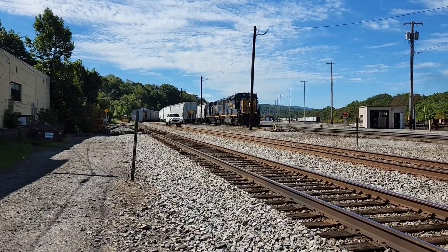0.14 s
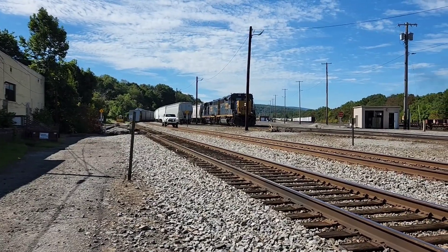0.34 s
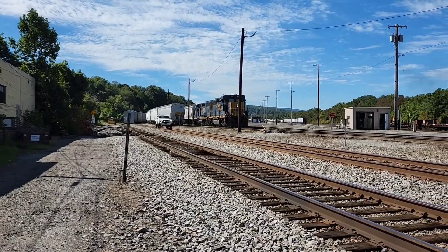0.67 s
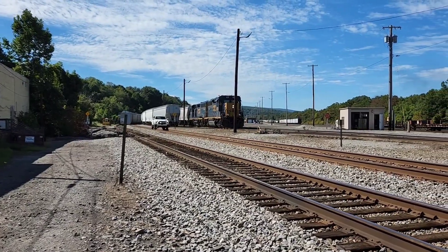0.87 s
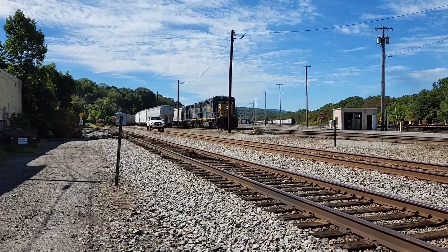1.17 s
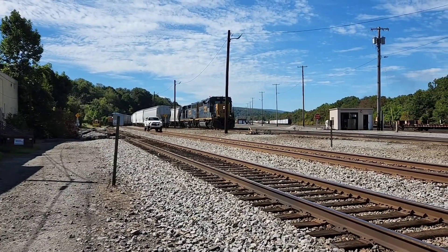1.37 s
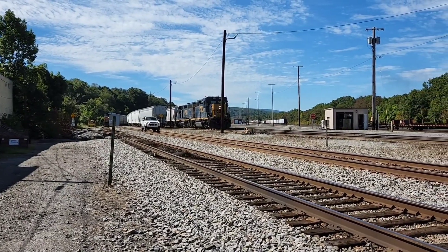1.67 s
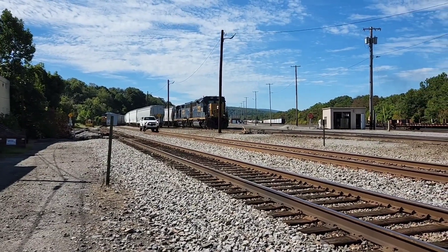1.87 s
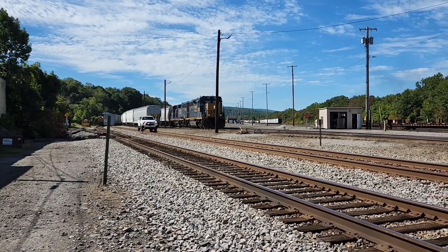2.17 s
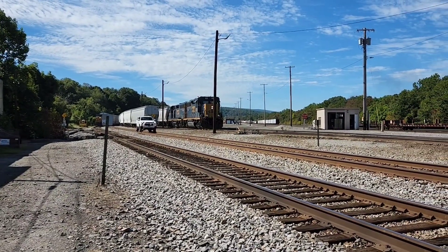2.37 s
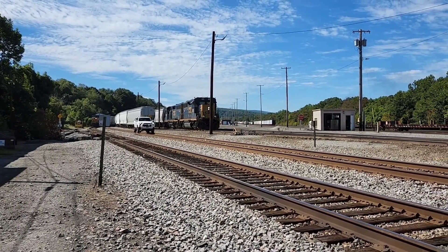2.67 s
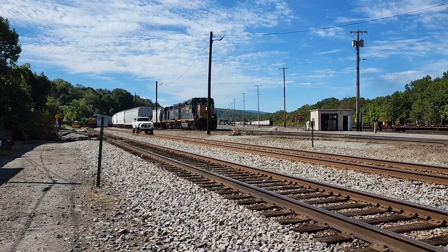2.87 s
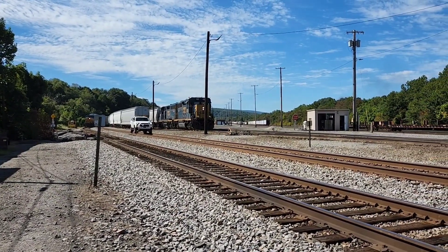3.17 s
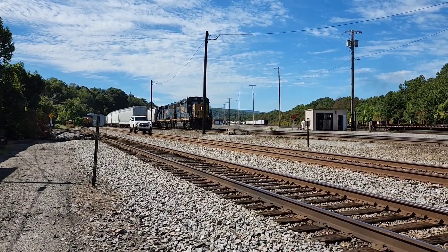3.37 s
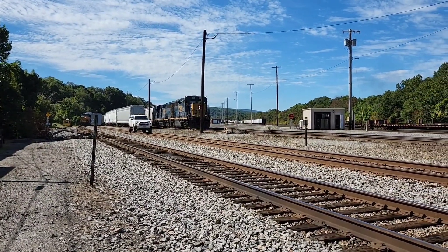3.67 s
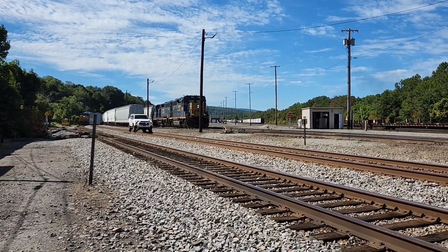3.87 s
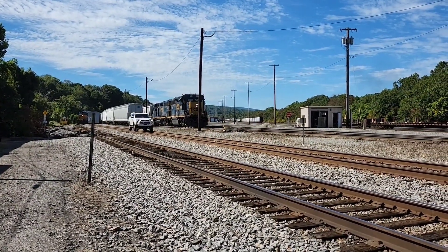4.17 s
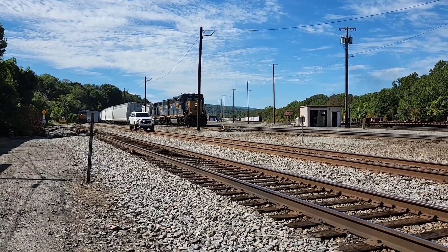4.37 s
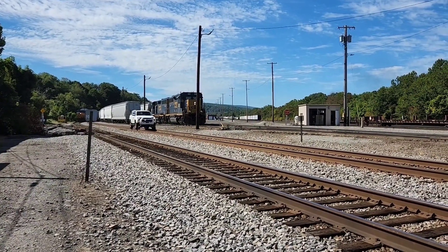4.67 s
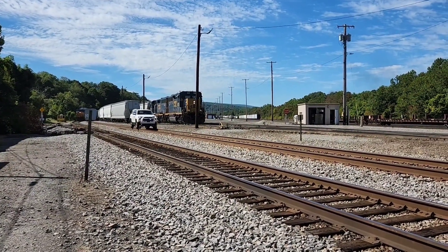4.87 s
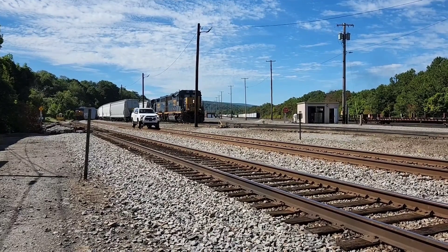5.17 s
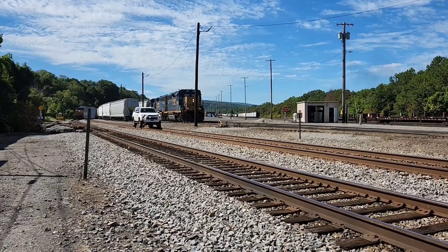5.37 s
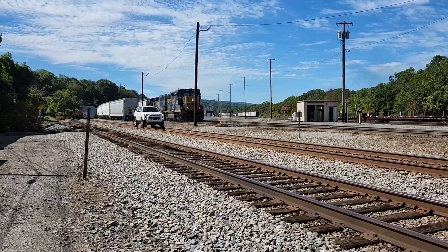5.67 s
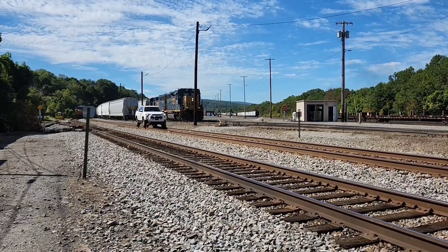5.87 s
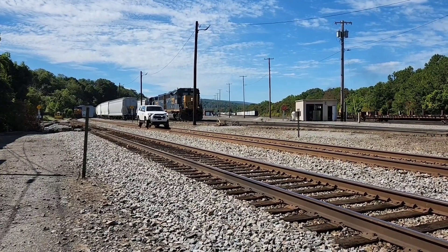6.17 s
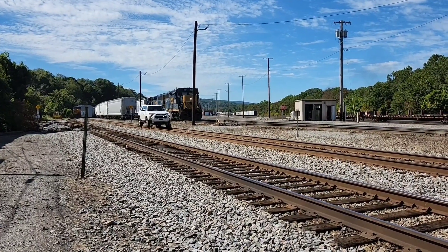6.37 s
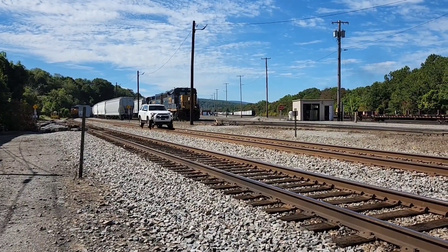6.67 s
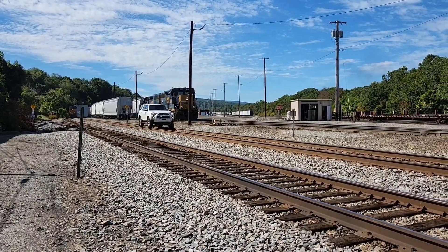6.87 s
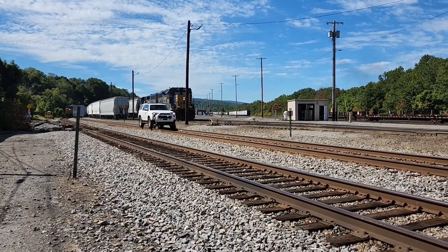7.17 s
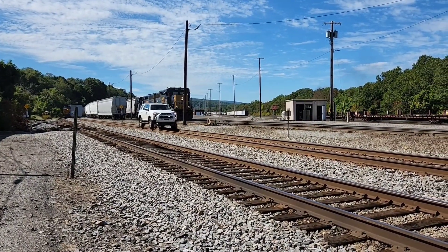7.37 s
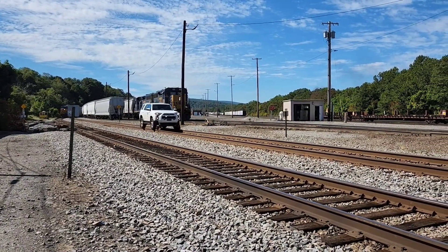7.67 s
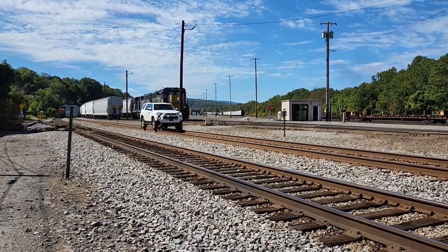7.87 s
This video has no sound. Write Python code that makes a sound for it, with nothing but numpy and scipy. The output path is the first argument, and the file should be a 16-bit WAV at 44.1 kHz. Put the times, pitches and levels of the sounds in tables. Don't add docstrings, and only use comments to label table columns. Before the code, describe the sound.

Two diesel locomotives idle with a deep throbbing rumble across an open rail yard, with whining gears, faint insects and one sharp air-valve blast midway.

```python
import sys
import numpy as np
from scipy import signal
from scipy.fft import rfft, irfft, next_fast_len
from scipy.io import wavfile
from scipy.ndimage import uniform_filter1d

SR = 44100
rng = np.random.default_rng(int(sys.argv[2]) if len(sys.argv) > 2 else 0)


def wav_record(signal):
    frames = np.transpose(np.atleast_2d(signal))
    bounded = np.clip(frames, -1, 1)
    quanta = np.round(bounded * 32767).astype(np.int16)
    wavfile.write(sys.argv[1], SR, quanta)


def ratio_of_db(decibels):
    return 10 ** (np.asarray(decibels, float) / 20)


N = 354123
SIZE = next_fast_len(N, True)
HZ = np.arange(SIZE // 2 + 1) * SR / SIZE + 1e-3
TIME = np.arange(N) / SR
STEP = 32
SLOW = np.arange(N // STEP + 2) * STEP / SR


def along(table):
    s, *columns = np.transpose(table)
    return [np.interp(SLOW, s, column) for column in columns]


def across(table, column=1):
    table = np.array(table)
    values = table[:, column]
    return np.interp(np.log(HZ), np.log(table[:, 0]), values, left=values[0], right=values[-1])


def full(control):
    return np.interp(TIME, SLOW, control)


def walk(rate):
    k = int(SR / STEP / rate)
    held = np.repeat(rng.standard_normal(len(SLOW) // k + 1), k)
    return 1.3 * uniform_filter1d(uniform_filter1d(held, k), k)[:len(SLOW)]


def hunted(level_db, drift_db_s, swing_db, loudest_s):
    hunt_s = 4.65
    return level_db + drift_db_s * SLOW + swing_db * np.cos(2 * np.pi * (SLOW - loudest_s) / hunt_s)


def bump(centre_s, length_s):
    return np.exp(-2 * ((SLOW - centre_s) / length_s) ** 2)


def swells(events, name):
    return sum(db * bump(s, length) for s, mine, db, length in events if abs(mine / name - 1) < .02)


def octave(step, width=1.):
    band = np.zeros(len(HZ))
    near = slice(int(2 ** (step - width) * SIZE / SR), int(2 ** (step + width) * SIZE / SR))
    band[near] = np.cos(np.pi / 2 * (np.log2(HZ[near]) - step) / width) ** 2
    return band


def hump(hz, width_hz):
    gain = 1 / (1 + ((HZ - hz) / (width_hz / 2)) ** 2)
    return gain / np.sqrt(np.pi * width_hz / 4)


def order(angle, db):
    return -np.sqrt(2) * ratio_of_db(db) * np.sin(angle)


# pitch_hz, left_minus_right_db, likeness (0-1)
PORT_SHADING = [(100, 1, .97), (300, -2, .8), (700, -1, .85), (1500, -1.5, .2), (2200, 2, .6),
                (2600, 9, .75), (3000, 11.5, .1), (4200, 5, .6), (5100, 5.5, .15), (5600, 3, .4),
                (8000, 6, .2), (9200, 13, .35), (10000, -0.5, .15), (11200, 0, .1), (15000, 8, .1)]
# pitch_hz, left_lead_rad
PORT_LEAD = [(0, 0), (1030, 1.6), (1550, 2.4), (2070, 7.7), (2410, 7.5), (2840, 8.9), (3530, 12.9),
             (4050, 13.4), (4310, 13.1), (5430, 17.9), (7750, 18.0), (9040, 17.8), (10800, 18.8),
             (15200, 19.0)]


def ports(direct=0., wave=None):
    noise, diffuse = rfft(rng.standard_normal((2, SIZE))) * np.sqrt(SR / 2)
    wave = noise if wave is None else rfft(wave, SIZE)
    alike = np.clip(np.maximum(across(PORT_SHADING, column=2), direct), 0, 1)
    late = np.exp(-1j * np.interp(HZ, *np.transpose(PORT_LEAD)))
    shade = ratio_of_db(across(PORT_SHADING) / 2)
    right = alike * late * wave + np.sqrt(1 - alike ** 2) * diffuse
    return np.array([wave * shade, right / shade])


def hear(spectra, db=None):
    sound = irfft(spectra, SIZE)[:, :N]
    return sound if db is None else sound * full(ratio_of_db(db))


def insects():
    joins_s, rise_s, lift_db = 7.3, .5, 2.2
    chorus_db = lift_db * np.clip((SLOW - joins_s) / rise_s, 0, 1) + .3 * walk(1.5)
    spectra = ports()
    peak_db = -58.3 + .6 * chorus_db + .2 * walk(6) + 2.2 * walk(90)
    flank_db = -63.5 + 1.5 * chorus_db + .4 * walk(5) + 1.2 * walk(60)
    return hear(spectra * hump(9190, 250), peak_db) + hear(spectra * hump(8800, 560), flank_db)


# pitch_hz, level_db (per Hz)
LOUVRE_ROAR = [(440, -81), (520, -60.5), (850, -62), (960, -66.5), (1150, -68), (1350, -64), (1600, -68.5),
               (2100, -71.5), (2900, -80.5), (4300, -82.5), (5200, -87.5), (8000, -93.5), (9800, -112),
               (11500, -118)]
# pitch_hz, level_db (per Hz)
TOP_HISS = [(10500, -120), (12500, -104), (14500, -105), (15700, -112)]
# start_s, level_db
BREEZE_CARRY = [(0, .3), (1.0, .3), (1.8, -1.2), (3.0, .6), (4.3, -.3), (5.3, .6), (6.2, .3), (6.9, -.8),
                (8.03, -.8)]


def roar():
    breeze_db = along(BREEZE_CARRY)[0]
    spectra = ports() * ratio_of_db(across(LOUVRE_ROAR) - 40 * (HZ < 420))
    out = hear(ports() * ratio_of_db(across(TOP_HISS)), 1.5 * walk(8))
    for step in np.arange(8.5, 14.5, .75):
        share = .4 if step < 9.8 else 1.5 if step < 11 else 1
        level_db = share * breeze_db + .6 * walk(1.5) + .9 * walk(9)
        out = out + hear(spectra * octave(step, .75), level_db)
    return out


# start_s, pitch_hz
MESH_SPEED = [(0, 4308), (.52, 4312), (.65, 4330), (.9, 4324), (1.3, 4300), (1.65, 4293), (2.1, 4302),
              (2.6, 4310), (4.4, 4308), (4.85, 4320), (5.3, 4310), (5.8, 4303), (6.2, 4310), (8.03, 4310)]
# pitch_hz, level_db, drift_db_s (dB per s), swing_db, loudest_s
MAIN_WHINES = [(863, -42.5, -1.2, 3.5, 1.4), (1234, -46.5, -.3, .8, -.3), (1294, -44, -.5, .8, 1.5),
               (2155, -55.5, .01, .5, .5), (4308, -57.5, -.6, 1.5, 4.2), (5695, -67.5, -.1, 1.5, 3.2),
               (6462, -68, .2, 1.5, 3.7)]
# pitch_hz, level_db
WEAK_WHINES = [(527, -52), (797, -52), (875, -54), (1368, -50), (1726, -59), (2590, -63), (4402, -68)]
# centre_s, pitch_hz, lift_db, length_s
WHINE_CARRIES = [(.4, 1234, 6, .8), (1.0, 1294, 4, .3), (1.62, 1294, 4, .15), (1.95, 863, 3, .5),
                 (3.3, 1294, 6, .25), (5.5, 1294, 4, .3), (6.2, 1294, 4, .3), (6.2, 1234, 6, .25),
                 (.4, 2155, 9, .15), (1.05, 2155, 9, .15), (3.25, 2155, 9, .15), (4.1, 2155, 6, .15),
                 (4.62, 2155, 9, .12), (4.9, 2155, 8, .2), (5.65, 2155, 6, .12), (7.05, 2155, 7, .15),
                 (7.8, 2155, 3, .15), (1.65, 5695, 3, .25), (3.1, 5695, 8, .6), (4.4, 5695, 6, .3),
                 (5.7, 5695, 3, .3), (.05, 6462, 5, .2), (1.8, 6462, 5, .4), (4.2, 6462, 6, .5),
                 (5.5, 6462, 2, .4), (6.5, 6462, 7, .12), (6.8, 6462, 6, .2)]


def whines():
    speed = along(MESH_SPEED)[0] / MESH_SPEED[0][1]
    lines = []
    for hz, *rule in MAIN_WHINES:
        fading_db = .3 * hz / 1000 * walk(4)
        lines.append((hz, hunted(*rule) + swells(WHINE_CARRIES, hz) + fading_db))
    lines.append((6466 / speed, -69 + 3 * walk(2.5)))
    lines += [(hz, db + 1.5 * walk(2)) for hz, db in WEAK_WHINES]
    tones = 0
    for hz, db in lines:
        turns = np.cumsum(hz * speed * (1 + .0008 * walk(20))) * STEP / SR
        tones = tones + np.sin(full(turns * 2 * np.pi)) * full(ratio_of_db(db + 3 + 1.8 * walk(12)))
    return hear(ports(direct=1., wave=tones))


# order (per turn), level_db
FAR_ORDERS = [(6, -44.5), (8, -52.5), (9, -35.5), (10, -45.5), (11, -49.5), (12, -33.5), (13, -43.5),
              (14, -45.5), (18, -51.5), (23, -44.5), (30, -42.5)]


def far_exhaust():
    turn_hz = 5.773
    crank = 2 * np.pi * turn_hz * (SLOW + .013 + .0005 * walk(.7))
    return sum(order(k * crank + .8, db + 2.0 * walk(1.5)) for k, db in FAR_ORDERS)


# start_s, level_db
VALVE_BLAST = [
    (3.387, -52),
    (3.398, -32),
    (3.42, -35),
    (3.462, -28.5),
    (3.54, -30.5),
    (3.6, -34.5),
    (3.678, -37),
    (3.692, -33),
    (3.815, -40.5),
]
# pitch_hz, level_db (per Hz)
JET_NOISE = [(530, -34), (900, -2), (1230, -8), (1450, -2.5), (2070, 0), (2860, -6), (4600, -.5),
             (7400, -6), (11000, -14.5), (13600, -7.5), (15500, -16)]
# peak_s, level_db, rise_s (before the peak), fall_s (after it), pitch_hz (centre), width_octaves
SOFT_SPITS = [
    (2.03, -53, .05, .07, 7000, .7),
    (2.22, -60, .06, .1, 10000, .9),
    (6.62, -43.5, .05, .06, 1900, .2),
]


def valve():
    peak_s, return_s, shut_s, tail_ends_s = 3.465, 3.685, 3.815, 4.14
    level_db, shut = along(VALVE_BLAST)[0], SLOW > shut_s
    loss_db = np.maximum(230 * (peak_s - SLOW), 64 * (SLOW - peak_s))
    top_db = np.where(shut, -8, 5 - loss_db)
    bottom_db = np.minimum(-3 + 30 * (SLOW - VALVE_BLAST[1][0]), 2.5)
    bottom_db = np.where((SLOW > return_s) & ~shut, -3, bottom_db)
    whistle_db = -15 + 11 * bump(3.755, .09)
    level_db = np.where(shut, -46 - 32 * (SLOW - shut_s), level_db)
    level_db = np.where((SLOW > VALVE_BLAST[0][0]) & (SLOW < tail_ends_s), level_db, -200)
    spectra = ports(direct=.55)
    jet = spectra * ratio_of_db(across(JET_NOISE) - 33 - 40 * (HZ < 800))
    out = hear(spectra * hump(8500, 2200), level_db + whistle_db)
    for step in np.arange(10.5, 15, 1.5):
        tilt_db = np.clip(step - 12.5, 0, 1) * top_db + np.clip(12 - step, 0, 1) * bottom_db
        out = out + hear(jet * octave(step, 1.5), level_db + tilt_db + .8 * walk(40))
    for s, db, rise, fall, hz, octaves in SOFT_SPITS:
        shape = np.exp(-.5 * (np.log2(HZ / hz) / octaves) ** 2) / np.sqrt(hz * octaves)
        puff = np.clip((TIME - s) / rise + 1, 0, 1) * np.exp(-np.clip(TIME - s, 0, None) / fall)
        out = out + hear(spectra * shape) * puff * ratio_of_db(db)
    return out


KNOCK_DB, KNOCK_DRIFT_DB_S = 3, -.6
# pitch_hz, level_db (per Hz)
GAS_RUMBLE = [(20, -82.5), (30, -69), (60, -57.5), (95, -55), (130, -59), (200, -61), (300, -66.5),
              (440, -70.5), (600, -78.5)]


def rumble(crank):
    gas = ports() * ratio_of_db(across(GAS_RUMBLE) - 40 * (HZ > 700))
    drift_db = KNOCK_DB / 2 + KNOCK_DRIFT_DB_S / 2 * SLOW
    return hear(gas, drift_db + 1.5 * np.cos(crank - .6) + 1.1 * walk(2))


# order (per turn), level_db, drift_db_s (dB per s)
STRONG_ORDERS = [(7, -19.6, -.17), (8, -19.2, -.02), (10, -28.2, .25)]
# order (per turn), level_db
WEAK_ORDERS = [(4, -38.5), (5, -46.5), (6, -39.5), (9, -39.5), (11, -43.5), (12, -40.5), (13, -35.5),
               (14, -47.5), (15, -47.5), (16, -47.5), (17, -45.5), (18, -52.5), (19, -51.5), (21, -54.5),
               (22, -57.5), (25, -59.5), (27, -58.5)]
# centre_s, order (per turn), lift_db, length_s
ORDER_SURGES = [(.5, 7, 1, .4), (1.0, 8, 2.4, .6), (2.1, 8, -1.8, .6), (3.9, 8, 1.3, .9), (5.0, 8, .9, .5),
                (6.6, 8, -.6, 1.2), (1.0, 10, -4, .9), (3.6, 10, 2, 1.3), (5.1, 10, -2.2, .7),
                (1.0, 9, 7, .9), (2.6, 9, 5, .9), (4.9, 9, 5, 1.0), (6.8, 9, 3, .9), (4.8, 13, 2, 1.2)]


def near_exhaust(crank):
    knock_db = KNOCK_DB + KNOCK_DRIFT_DB_S * SLOW
    levels = []
    for k, db, drift_db_s in STRONG_ORDERS:
        levels.append((k, db + drift_db_s * SLOW + swells(ORDER_SURGES, k) + .6 * walk(9)))
    for k, db in WEAK_ORDERS:
        levels.append((k, db + swells(ORDER_SURGES, k) + knock_db * (k > 13) + 1.8 * walk(3)))
    out = 0
    for k, db in levels:
        lag = .17 * (k - 7) * (k - 8) if k < 9 else np.pi - 1.9 * (k - 9)
        if k > 9:
            lag = lag + hunted(.2, 0, .45, .6) + .16 * (k - 10) * walk(1.2)
        out = out + order(k * crank + lag, db)
    return out


def scene():
    turn_hz = 10.92
    lead_s = hunted(5.05, 0, 1.35, 2.22) / 1000
    crank = 2 * np.pi * turn_hz * (SLOW + lead_s)
    exhausts = signal.resample_poly(near_exhaust(crank) + far_exhaust(), STEP, 1, padtype="smooth")
    left_ahead = 6
    exhausts = np.array([exhausts[left_ahead:][:N], exhausts[:N]])
    return insects() + roar() + whines() + valve() + rumble(crank) + exhausts


def gate(dry):
    from_hz, gate_db = 9650, -106
    hz, _, frames = signal.stft(dry, SR, "cosine", 2048, scaling="psd")
    power = uniform_filter1d(2 * np.abs(frames) ** 2, size=24, axis=1)
    power = uniform_filter1d(power, size=3, axis=2)
    power = np.repeat(power[:, 12::24], 24, axis=1)[:, :len(hz)]
    waver = uniform_filter1d(rng.standard_normal(power.shape[2]), size=3)
    bar_db = gate_db + np.minimum(8 * waver, 2.5)
    frames = frames * ((power > ratio_of_db(2 * bar_db)) | (hz[:, None] < from_hz))
    return signal.istft(frames, SR, "cosine", 2048, scaling="psd")[1][:, :N]


def low_pass(x):
    return signal.sosfilt(signal.butter(12, 15740, fs=SR, output="sos"), x)


def record(dry):
    mix = gate(dry)
    return low_pass(mix)


dry = scene()
out = record(dry)
wav_record(out)
```